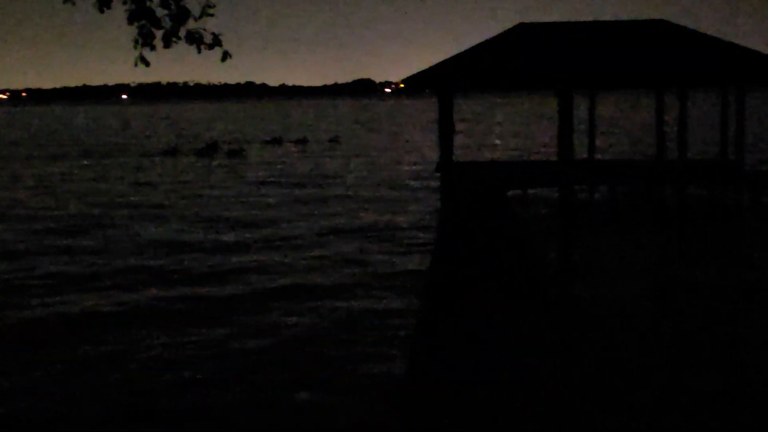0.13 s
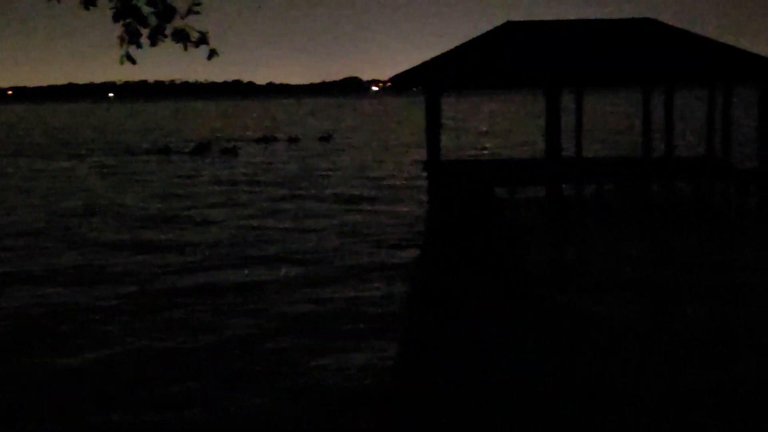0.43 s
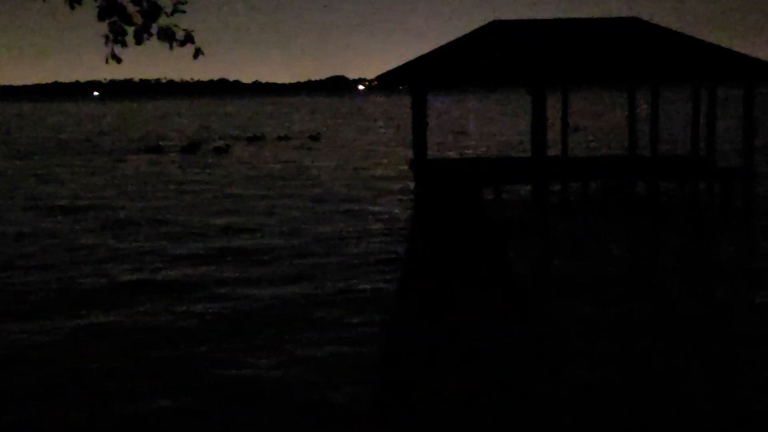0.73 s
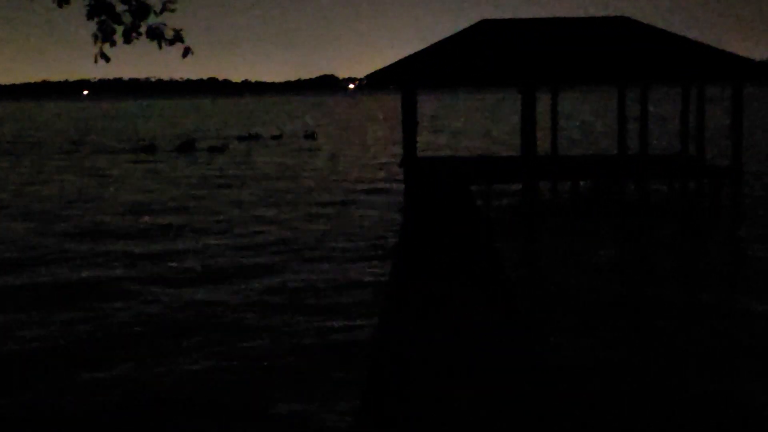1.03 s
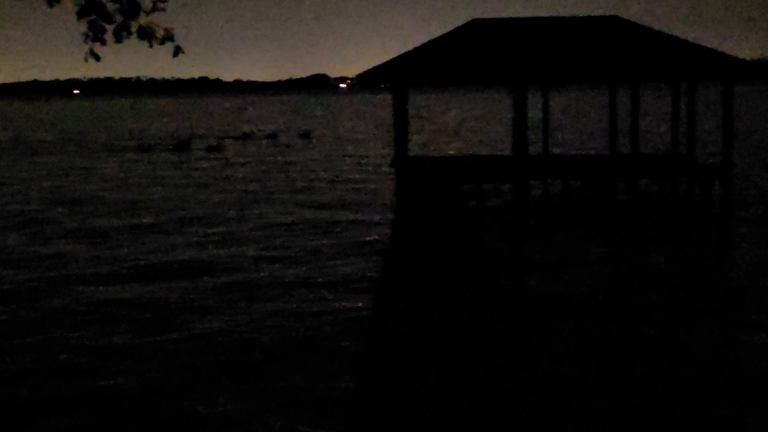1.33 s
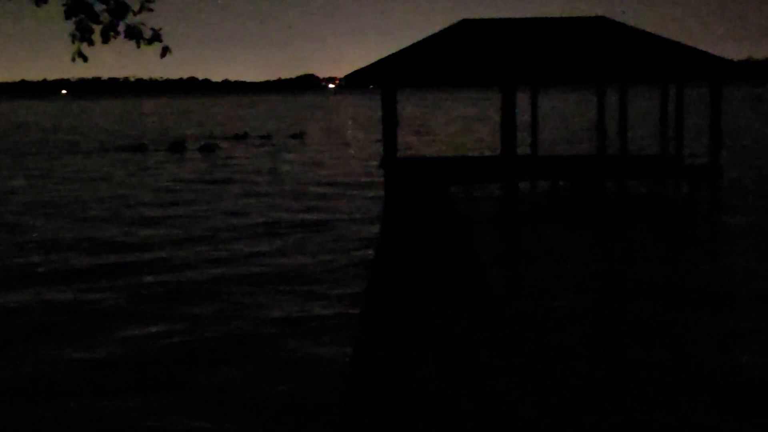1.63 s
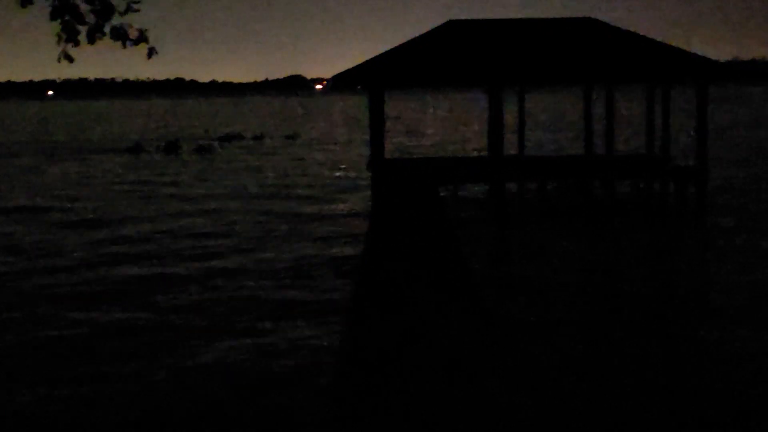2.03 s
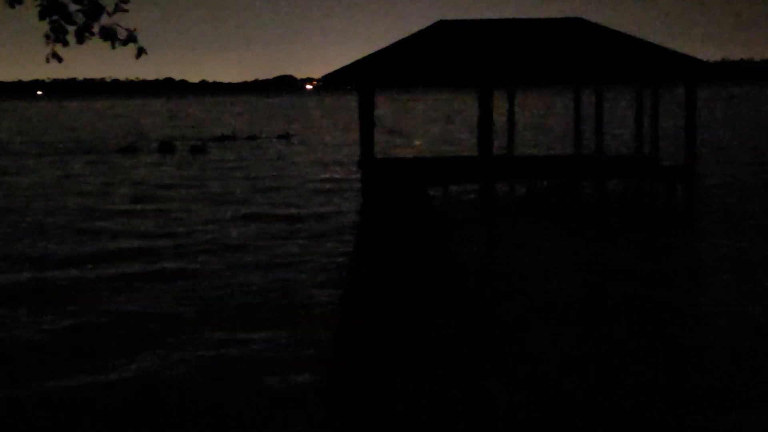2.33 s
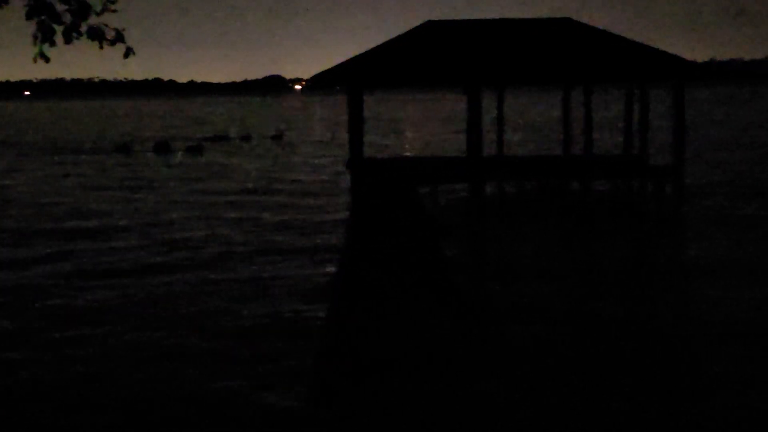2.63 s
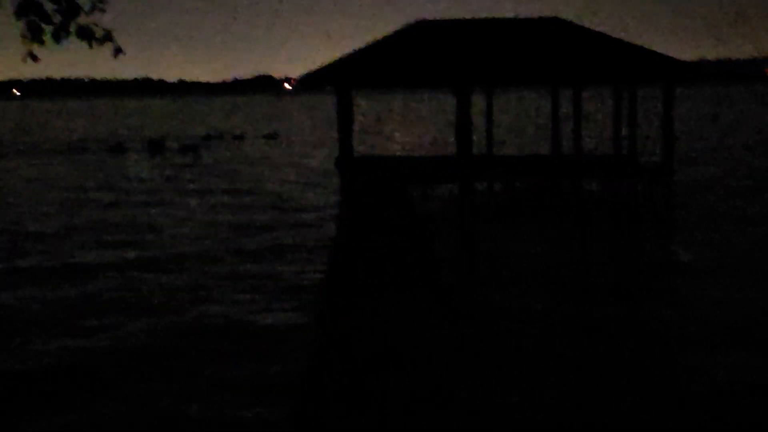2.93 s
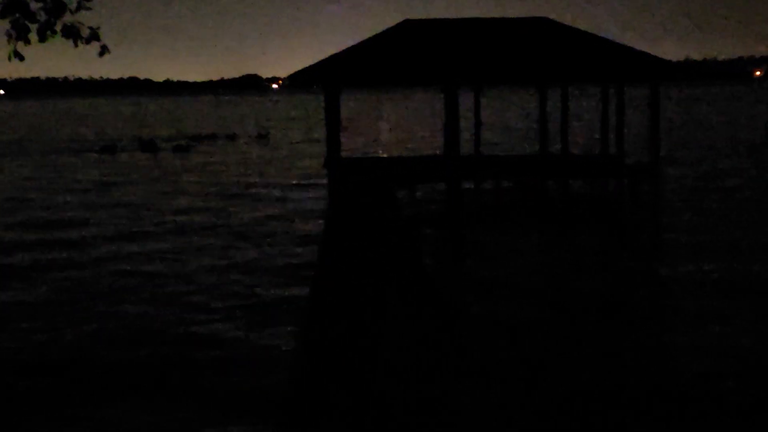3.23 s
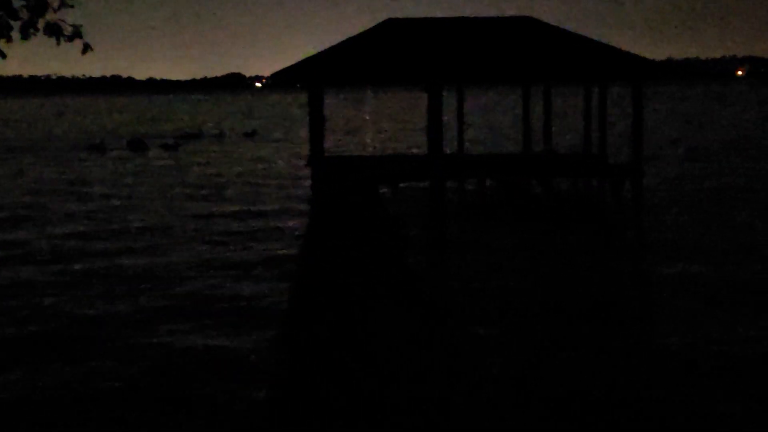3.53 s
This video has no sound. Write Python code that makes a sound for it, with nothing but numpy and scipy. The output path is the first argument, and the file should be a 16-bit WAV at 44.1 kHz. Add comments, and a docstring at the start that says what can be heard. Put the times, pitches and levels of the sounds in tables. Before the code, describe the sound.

Gentle lake water laps against a wooden dock at night, with hollow slaps, gulping bubbles and ticking drops in uneven bursts. A low distant rumble throbs steadily beneath faint hiss; close stereo microphones, water mostly right.

```python
"""A wooden dock on a lake at night, with small waves lapping at it.
Slosh, patter and spray are dense clouds of tiny decaying sines that swell with each wave. Slaps excite the
resonances of the hollows under the boards, air pockets gulp as rising decaying tones, drops snap and ring,
and splashes are short grain showers; all the water gets short echoes off the dock.
Filtered noise gives a low, distant rumble from the right, a breeze and a faint hiss; a sine whines thinly."""
import sys
import numpy as np
from scipy import signal
from scipy.fft import rfft, irfft
from scipy.io import wavfile
from scipy.ndimage import uniform_filter1d

SR = 44100
rng = np.random.default_rng(int(sys.argv[2]) if len(sys.argv) > 2 else 0)


def unload_wav(signal):
    """Save mono or channel-first audio to the path in sys.argv[1] as 16-bit WAV at rate SR, clipped to [-1, 1]."""
    wavfile.write(
        sys.argv[1],
        SR,
        np.round(np.clip(np.atleast_2d(signal).T, -1, 1) * 32767).astype(np.int16),
    )


N = 162288  # length in samples

# Spectrum of the distant rumble, relative: frequency_hz, density_db (per Hz)
RUMBLE_SPECTRUM = [(15, -33), (25, -12.5), (38, -8), (52, -1.5), (66, -1), (78, 6.5), (92, -5),
                   (120, -16.5), (160, -27.5), (250, -37.5), (500, -65)]
# Strength of the rumble over time, relative to RUMBLE_DB: time_s, level_db
RUMBLE_LEVEL = [(0, 0.5), (.62, 2.5), (1.0, 0.5), (1.9, 0.5), (2.9, 1), (3.05, -6), (3.3, 0.5), (3.68, 0)]
# Spectrum of air moving at the microphones, relative: frequency_hz, density_db (per Hz)
BREEZE_SPECTRUM = [(15, -9), (40, 1.5), (70, 6.5), (120, -16), (300, -46), (1000, -64)]
# Spectrum of the steady hiss, relative: frequency_hz, density_db (per Hz)
HISS_SPECTRUM = [(100, -28), (250, -12.5), (600, 0), (1100, -5), (1800, -3), (3200, -5), (4000, -3.5),
                 (4700, 4.5), (5400, -9.5), (8000, -9), (10300, -21), (12200, -11), (13500, -20),
                 (16000, -26)]
# Drops striking water and wood: start_s, pitch_hz, ring_peak_db (before panning), t60_s,
# left_lag_ms, left_minus_right_db
DROPS = [(.460, 5200, -47.5, .007, 0.32, -3), (.571, 6840, -45, 0.0012, .167, 0),
         (0.573, 12400, -54, .002, 0.096, -2), (.604, 6400, -57, .005, .1, -2),
         (.667, 13500, -58, .002, .09, 0), (.786, 5000, -52, .012, .1, -8),
         (1.292, 5230, -48, 0.002, 0.024, -6), (1.4406, 5300, -44, .0015, .038, -5),
         (1.6505, 6100, -57, .003, .024, -2), (1.6825, 6130, -55, .003, .038, -5),
         (1.7985, 4200, -49, .005, .05, -3), (2.0325, 5300, -50, .004, 0.11, -6),
         (2.0775, 6500, -47, .0012, 0.11, -5), (2.078, 11600, -50, .0012, 0.054, -8),
         (2.0815, 5200, -46, .0012, .06, -7), (2.545, 3660, -52, .006, .083, 1),
         (2.744, 4400, -46, .0048, .11, 2), (2.7468, 4850, -37, .001, 0.036, -5),
         (3.1517, 7930, -44, 0.0029, 0.13, 5), (3.2754, 4400, -45, 0.011, 0.11, -7),
         (3.465, 5200, -54, .005, .1, -10)]
# Ringing air pockets: start_s, pitch_hz, peak_db (before the tremble), t60_s,
# pitch_rise (share of pitch over t60), left_lag_ms
AIR_POCKETS = [(.194, 373, -58, 0.075, .1, .3), (.318, 258, -53.5, 0.059, .1, .22),
               (.501, 320, -46.5, .16, 0.035, .12), (.504, 430, -48.5, .1, .06, .19),
               (.53, 328, -47.5, .09, .15, .14), (.831, 786, -51, 0.034, .15, .25),
               (.881, 1293, -44.5, 0.024, 0.17, 0.22), (.919, 2680, -55.5, 0.11, 0.069, .24),
               (1.028, 417, -51.5, 0.1, .05, 0.38), (1.412, 467, -56, 0.045, .1, 0.36),
               (1.43, 1335, -46.5, 0.027, .15, 0.22), (1.68, 369, -49, 0.036, 0.33, 0.27),
               (1.76, 1300, -58, 0.065, .08, 0.19), (1.8, 5250, -53, .06, .03, .03),
               (1.885, 2210, -58, .073, .11, 0.14), (2.079, 1196, -50.5, 0.043, .03, .15),
               (2.087, 893, -55, .075, .3, .17), (2.124, 1346, -43, 0.047, .02, 0.13),
               (2.137, 1332, -46.5, 0.11, 0.051, 0.08), (2.247, 715, -58, .075, 0.22, .16),
               (2.581, 1113, -57.5, 0.028, .1, .2), (2.582, 455, -54, 0.047, .05, .24),
               (2.639, 762, -56.5, 0.057, 0.58, 0.21), (2.717, 1775, -56, 0.043, 0.54, 0.17),
               (2.744, 770, -56.5, 0.026, .03, 0.17), (3.431, 340, -56, 0.12, .1, .3),
               (3.619, 181, -46.5, 0.15, .11, 0.27)]
# Showers of fine droplets: start_s, length_s (half the time rendered), pitch_hz,
# level_db (RMS at the strongest moment, before panning), left_minus_right_db
SPLASHES = [(0.473, 0.091, 5300, -64.5, 1), (.545, 0.068, 5700, -64, 0), (0.481, 0.059, 1860, -63.5, -2),
            (.557, .07, 1960, -63, -2), (0.709, .085, 6300, -68, 3), (0.827, 0.068, 480, -68, 0),
            (0.851, 0.082, 1200, -63.5, -2), (1.777, 0.055, 3670, -61, -2), (1.79, 0.051, 4900, -59.5, -2),
            (2.022, 0.087, 5400, -64.5, -6), (2.022, .11, 12000, -78, -10), (2.035, .06, 427, -62.5, -2),
            (2.05, .055, 2170, -66, -2), (2.118, 0.032, 2790, -63.5, 0), (2.121, 0.033, 1450, -60, -4),
            (2.233, 0.068, 2500, -62, 0), (2.55, .14, 520, -69.5, -1), (2.62, .2, 770, -69.5, -3),
            (3.427, 0.35, 2950, -72.5, -3), (3.574, 0.2, 5700, -66, 1)]
# Water slapping into a hollow under the boards: start_s, brightest_hz, peak_db, left_lag_ms
SLAPS = [(0.4535, 1700, -45.5, .51), (.488, 1720, -49, .45), (.497, 1710, -50, 0.56),
         (.5052, 1880, -45, 0.62), (.514, 1950, -50, 0.59), (0.5545, 2000, -45, 0.57),
         (.565, 1950, -50, 0.58), (.574, 1850, -52, .55), (.585, 1900, -51, 0.52), (.7922, 1950, -54, 0.57),
         (1.042, 1750, -52, 0.58), (1.0657, 1700, -52, 0.57), (1.1575, 1690, -54, .5),
         (1.179, 1640, -50, 0.57), (1.193, 1540, -54, 0.47), (1.4154, 1840, -58, .4),
         (1.5446, 1850, -48.5, 0.49), (1.6129, 1990, -56, 0.54), (1.6504, 1600, -56, 0.48),
         (2.033, 1900, -52, 0.18), (2.073, 1850, -55, .2), (2.1237, 1500, -55, 0.13),
         (2.2388, 1980, -37, .02), (2.2445, 2100, -45, .02), (2.257, 2050, -47, .02),
         (3.3146, 1950, -47, .02), (3.3252, 2470, -51, 0.081)]
# Resonances of the hollow: frequency_hz, t60_s
HOLLOW_MODES = [(1450, .009), (1700, 0.013), (2000, .012), (2400, .009)]
# Waves; their power adds to the calm level: start_s, length_s, slosh_db, patter_db, spray_db
WAVES = [(0.116, 0.44, -73, -74, -77), (0.424, 0.24, -63.5, -65, -66.5), (0.705, 0.35, -74.5, -71.5, -74.5),
         (0.953, 0.35, -73.5, -71, -72.5), (1.3, 0.17, -81, -68, -75.5), (1.513, 0.25, -90, -72, -96),
         (1.995, 0.17, -65.5, -64.5, -64), (2.157, 0.2, -69, -65.5, -67.5), (2.327, 0.31, -72, -71.5, -72),
         (2.5, 0.38, -72, -72, -68.5), (2.772, 0.18, -83, -91, -71.5), (3.312, 0.28, -70, -70, -80),
         (3.376, 0.38, -84, -65, -68.5)]
# Grain clouds, dense ones first, then the sparse, larger grains among them:
# centre_hz, spread_octaves (standard deviation), ring_cycles (to -60 dB), rate_per_s, mean_scatter_db
SLOSH_GRAINS = (545, 0.71, 10.2, 500, 2.3)
PATTER_GRAINS = (1863, 0.33, 10.3, 610, 3.4)
SPRAY_GRAINS = (5420, 0.583, 13, 3000, 2.3)
GURGLE_GRAINS = (637, 0.69, 12, 70, 0.49)
TRICKLE_GRAINS = (1706, 0.28, 12.5, 80, 2.2)
TICK_GRAINS = (5170, 0.45, 21, 90, 1.3)
# Droplets of a splash: spread_octaves, ring_cycles, rate_per_s, mean_scatter_db
SHOWER_GRAINS = (0.19, 10, 700, 3.2)

RUMBLE_DB, RUMBLE_LAG_MS = -43, 0.512
RUMBLE_EVENNESS = 0.29  # exponent that flattens the throbbing: 0 none, 1 fully
BREEZE_DB, HISS_DB = -57, -66.5
WHINE_HZ, WHINE_DB = 7897, -87.5
GRAIN_RISE_CYCLES, DROP_RISE_CYCLES, POCKET_RISE_CYCLES, SLAP_RISE_CYCLES = 0.79, 1.4, 2.5, 0.7
GRAIN_GLIDE = 0.089  # pitch rise over t60, as a share; used for grains and drops
SNAP_HZ, SNAP_T60_S = 11200, 0.0008
SNAP_DB = -5  # against the drop's ring, for a drop pitched at SNAP_HZ
TREMBLE_DEPTH, TREMBLE_CYCLES = 0.27, 3.53  # random depth as a share; pitch cycles between its points
SPLASH_PEAK = 0.3  # share of length_s at which a splash is strongest
HOLLOW_DETUNE = 0.023  # standard deviation, share of frequency
SLAP_WIDTH_OCTAVES = 0.25
WAVE_ATTACK, WAVE_RELEASE = 0.23, 0.27  # shares of a wave's length
CALM_SLOSH_DB, CALM_PATTER_DB, CALM_SPRAY_DB = -69.5, -74.5, -78.5
GURGLE_DB, TRICKLE_DB, TICKS_DB = -6, -2, -3.5  # larger grains against their dense cloud
SLOSH_LAG_MS, SHORE_LAG_MS = 0.35, 0.522
SHORE_DIFFUSE, SPRAY_DIFFUSE = 0.33, 0.98  # share of power unrelated between the ears
ECHO_T60_S, ECHO_GAP_S, ECHO_TOP_HZ = 0.066, 0.003, 2670
# Echo energy against the direct sound, before the echo's treble is dulled
LAPPING_ECHO_DB, POCKET_ECHO_DB, DROP_ECHO_DB, SLAP_ECHO_DB = -1.5, -6.5, 3.5, -4
TOP_HZ = 15700


def undb(db):
    """Amplitude ratio: twenty decibels are a factor of ten."""
    return 10 ** (np.asarray(db) / 20)


def unit(x):
    """Normalization to an RMS of one."""
    return x / np.sqrt(np.mean(x ** 2))


def add(out, start_s, sound):
    """Superposition: a sound is summed in at its time."""
    i = max(int(start_s * SR), 0)
    part = sound[..., :max(out.shape[-1] - i, 0)]
    out[..., i:i + part.shape[-1]] += part


def pan(left_minus_right_db):
    """Interaural level difference, split evenly between the ears."""
    return undb(np.array([[left_minus_right_db], [-left_minus_right_db]]) / 2)


def ears(x, lag_ms):
    """Interaural time difference: sound from the right reaches the left microphone later."""
    cycles_per_ms = np.fft.rfftfreq(len(x), 1000 / SR)
    delay = np.exp(-2j * np.pi * cycles_per_ms * lag_ms)
    left = irfft(rfft(x) * delay, len(x))
    return np.array([left, x])


def noise(spectrum):
    """Spectral shaping: white noise is weighted by a curve interpolated over log frequency."""
    hz, db = np.array(spectrum).T
    f = np.fft.rfftfreq(N, 1 / SR)
    weight = undb(np.interp(np.log(f + 1), np.log(hz), db))
    white = rng.standard_normal(N)
    return unit(irfft(rfft(white) * weight, N))


def ring(hz, t60, rise_cycles, glide):
    """Damped oscillation: a sine decays exponentially while its pitch rises by the glide."""
    t = np.arange(int(t60 * SR) + 64) / SR
    onset = 1 - np.exp(-(t * hz / rise_cycles) ** 2)
    decay = np.exp(-np.log(1000) * t / t60)
    envelope = onset * decay
    phase = 2 * np.pi * hz * (t + glide * t * t / t60 / 2)
    return envelope / envelope.max() * np.sin(phase)


def cloud(hz, octaves, cycles, rate, scatter_db, size=N):
    """Granular superposition: many tiny bubbles ring at random times, pitches and strengths."""
    out = np.zeros(size)
    for when, a, b, chance, sign in rng.random((int(rate * size / SR) + 1, 5)):
        # sqrt(6) gives the difference of two uniform draws a unit standard deviation
        f = min(hz * 2 ** (octaves * np.sqrt(6) * (a - b)), SR / 2.5)
        gain = undb(-scatter_db * np.log(max(chance, .01))) * np.sign(sign - .5)
        add(out, when * size / SR, gain * ring(f, cycles / f, GRAIN_RISE_CYCLES, GRAIN_GLIDE))
    return unit(out)


def echoes(x, db):
    """Diffuse reflection off boards and piles: a dull decaying noise tail, different at each ear."""
    t = np.arange(SR // 4) / SR
    decay = (t > ECHO_GAP_S) * np.exp(-np.log(1000) * t / ECHO_T60_S)
    tail = rng.standard_normal((2, len(t))) * decay
    tail /= np.sqrt(np.sum(tail ** 2, axis=1, keepdims=True))
    tail = signal.lfilter(*signal.butter(1, ECHO_TOP_HZ, fs=SR), tail)
    return x + undb(db) * signal.fftconvolve(x, tail, axes=1)[:, :N]


def hiss():
    """Uncorrelated noise sources: even hiss, unrelated left and right, with a thin steady sine."""
    whine = np.sqrt(2) * np.sin(2 * np.pi * WHINE_HZ * np.arange(N) / SR)
    both = np.array([noise(HISS_SPECTRUM), noise(HISS_SPECTRUM)])
    return undb(HISS_DB) * both + undb(WHINE_DB) * whine


def breeze():
    """Local turbulence: air moving at each microphone makes its own low noise."""
    return undb(BREEZE_DB) * np.array([noise(BREEZE_SPECTRUM), noise(BREEZE_SPECTRUM)])


def rumble():
    """Narrow-band fluctuation: far, low noise throbs, partly evened, and dips briefly late on."""
    x = noise(RUMBLE_SPECTRUM)
    strength = uniform_filter1d(np.abs(signal.hilbert(x)), size=SR // 10)
    drone = unit(x / strength ** RUMBLE_EVENNESS)
    level_db = RUMBLE_DB + np.interp(np.arange(N) / SR, *np.array(RUMBLE_LEVEL).T)
    return undb(level_db) * ears(drone, RUMBLE_LAG_MS)


def drops():
    """Impact and resonance: each drop snaps and rings; the snap is stronger for higher pitches."""
    out = np.zeros((2, N))
    for start, hz, db, t60, lag_ms, pan_db in DROPS:
        gain = undb(db) * pan(pan_db)
        body = ring(hz, t60, DROP_RISE_CYCLES, GRAIN_GLIDE)
        snap = ring(SNAP_HZ, SNAP_T60_S, DROP_RISE_CYCLES, 0)
        add(out, start, gain * ears(body, lag_ms))
        add(out, start, gain * undb(SNAP_DB) * hz / SNAP_HZ * ears(snap, lag_ms))
    return out


def air_pockets():
    """Bubble resonance: trapped air rings, its strength trembling as the water shifts around it."""
    out = np.zeros((2, N))
    for start, hz, db, t60, glide, lag_ms in AIR_POCKETS:
        tone = ring(hz, t60, POCKET_RISE_CYCLES, glide)
        knots = np.arange(len(tone)) / SR * hz / TREMBLE_CYCLES
        tremble = np.interp(knots, np.arange(64), rng.standard_normal(64))
        trembling = unit(tone * (1 + TREMBLE_DEPTH * tremble))
        # the tremble leaves the RMS of the plain tone unchanged
        add(out, start, undb(db) * tone.std() * ears(trembling, lag_ms))
    return out


def splashes():
    """Breakup of a crest: a shower of droplet grains swells quickly and thins out."""
    out = np.zeros((2, N))
    for start, length, hz, db, pan_db in SPLASHES:
        size = int(2 * length * SR)
        u = np.arange(size) / SR / (SPLASH_PEAK * length)
        envelope = (u * np.exp(1 - u)) ** 2
        shower = np.array([cloud(hz, *SHOWER_GRAINS, size=size) for _ in range(2)])
        add(out, start, undb(db) * pan(pan_db) * envelope * shower)
    return out


def slaps():
    """Cavity resonance: water claps into a hollow whose modes shift a little from slap to slap."""
    out = np.zeros((2, N))
    for start, bright_hz, db, lag_ms in SLAPS:
        clap = np.zeros(SR // 20)
        for k, (hz, t60) in enumerate(HOLLOW_MODES):
            weight = np.exp(-.5 * (np.log2(hz / bright_hz) / SLAP_WIDTH_OCTAVES) ** 2)
            mode_hz = hz * (1 + HOLLOW_DETUNE * rng.standard_normal())
            # neighbouring modes start with opposite sign
            add(clap, 0, (-1) ** k * weight * ring(mode_hz, t60, SLAP_RISE_CYCLES, 0))
        add(out, start, undb(db) * ears(clap / np.abs(clap).max(), lag_ms))
    return out


def shore(grains, diffuse, lag_ms):
    """Partial coherence: a grain cloud comes partly from the right, partly from all sides."""
    direct = ears(cloud(*grains), lag_ms)
    around = np.array([cloud(*grains), cloud(*grains)])
    return np.sqrt(1 - diffuse) * direct + np.sqrt(diffuse) * around


def swell(start, length):
    """Amplitude envelope: linear attack, hold and release of one wave."""
    u = (np.arange(N) / SR - start) / length
    return np.clip(np.minimum(u / WAVE_ATTACK, (1 - u) / WAVE_RELEASE), 0, 1)


def lapping():
    """Addition of powers: each wave lifts slosh, patter and spray above their calm level."""
    layers = [(SLOSH_GRAINS, CALM_SLOSH_DB, SHORE_DIFFUSE, SLOSH_LAG_MS, GURGLE_GRAINS, GURGLE_DB),
              (PATTER_GRAINS, CALM_PATTER_DB, SHORE_DIFFUSE, SHORE_LAG_MS, TRICKLE_GRAINS, TRICKLE_DB),
              (SPRAY_GRAINS, CALM_SPRAY_DB, SPRAY_DIFFUSE, SHORE_LAG_MS, TICK_GRAINS, TICKS_DB)]
    out = np.zeros((2, N))
    for k, (fine, calm_db, diffuse, lag_ms, coarse, coarse_db) in enumerate(layers):
        power = np.full(N, undb(calm_db) ** 2)
        for start, length, *levels_db in WAVES:
            power += (undb(levels_db[k]) * swell(start, length)) ** 2
        dense = shore(fine, diffuse, lag_ms)
        sparse = undb(coarse_db) * ears(cloud(*coarse), lag_ms)
        out += np.sqrt(power) * unit(dense + sparse)
    return out


def scene():
    """Superposition of the steady background and the water with its echoes."""
    background = hiss() + breeze() + rumble()
    small_water = echoes(drops(), DROP_ECHO_DB) + echoes(air_pockets(), POCKET_ECHO_DB)
    waves = echoes(slaps(), SLAP_ECHO_DB) + echoes(splashes() + lapping(), LAPPING_ECHO_DB)
    return background + small_water + waves


def record(dry):
    """Band limitation: the recorder's steep elliptic low-pass cuts the top."""
    return signal.sosfilt(signal.ellip(10, .1, 80, TOP_HZ, fs=SR, output="sos"), dry)


dry = scene()
out = record(dry)
unload_wav(out)
```